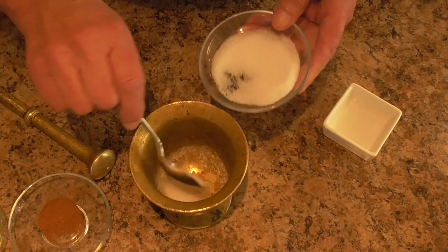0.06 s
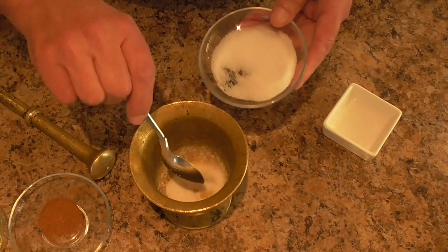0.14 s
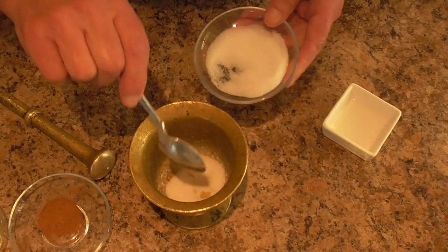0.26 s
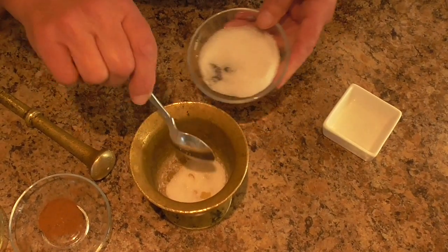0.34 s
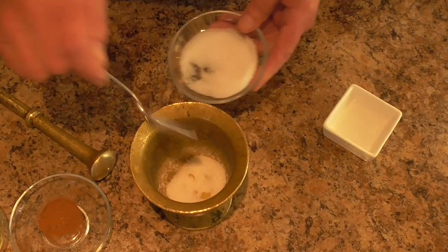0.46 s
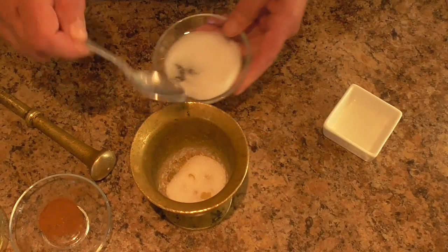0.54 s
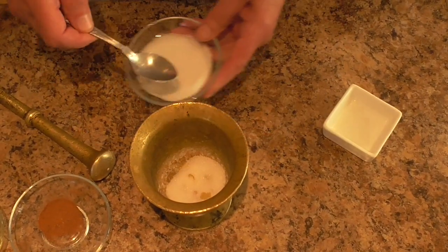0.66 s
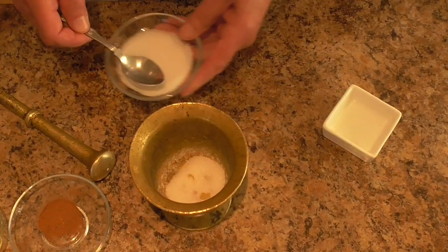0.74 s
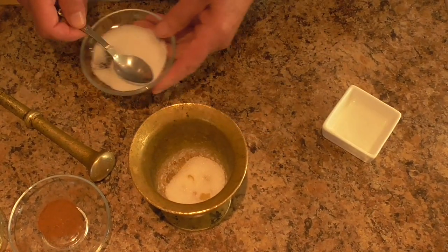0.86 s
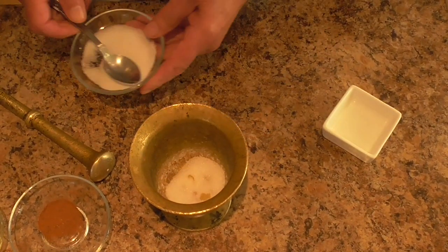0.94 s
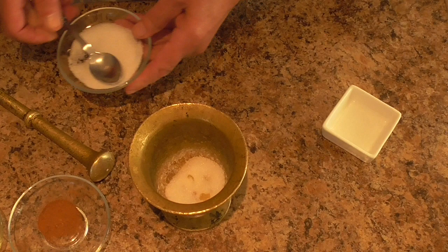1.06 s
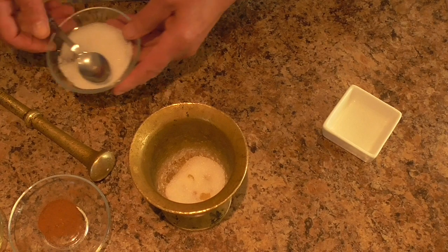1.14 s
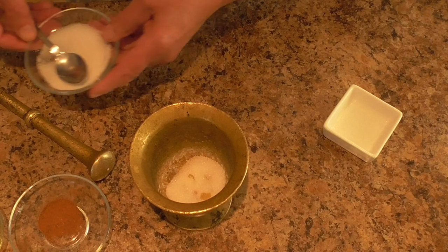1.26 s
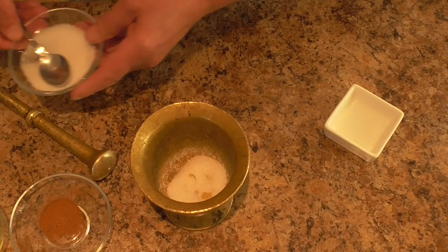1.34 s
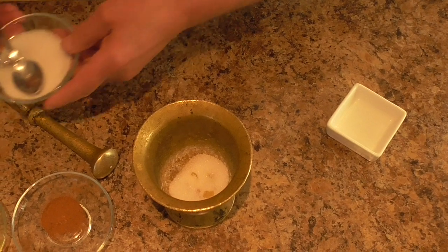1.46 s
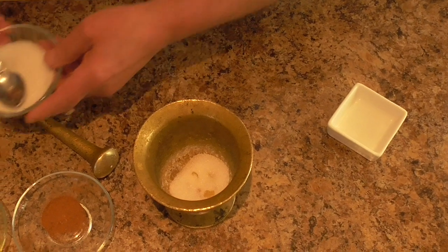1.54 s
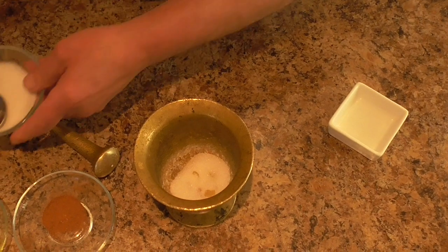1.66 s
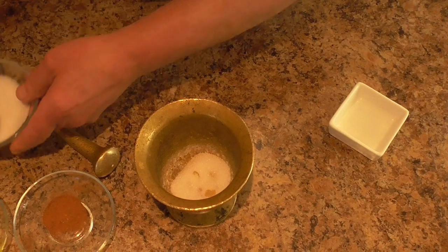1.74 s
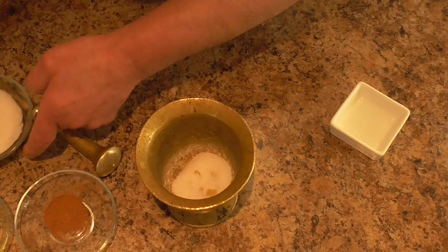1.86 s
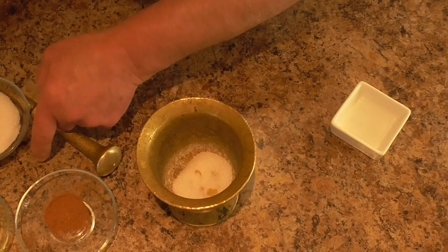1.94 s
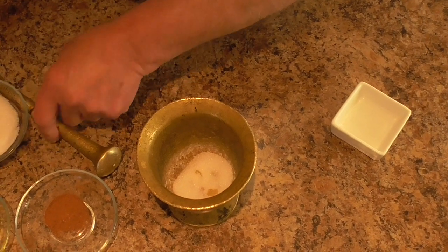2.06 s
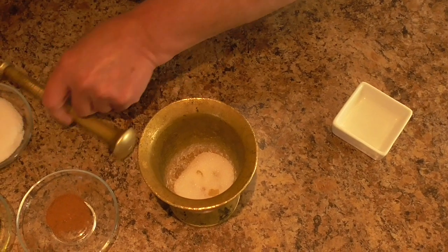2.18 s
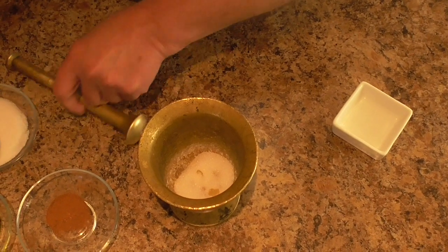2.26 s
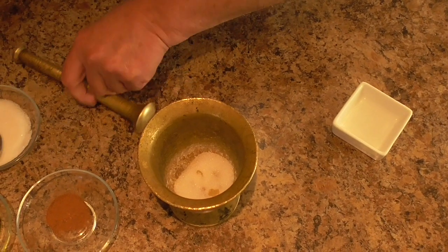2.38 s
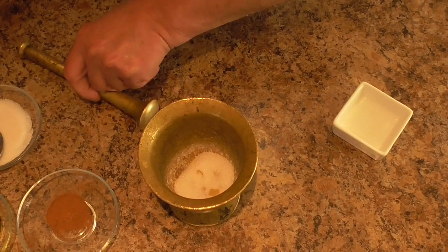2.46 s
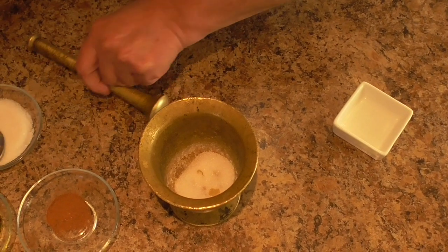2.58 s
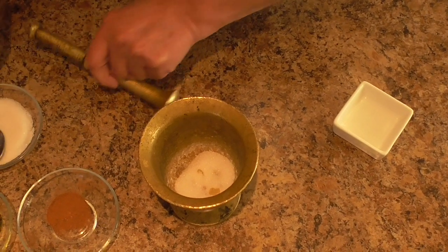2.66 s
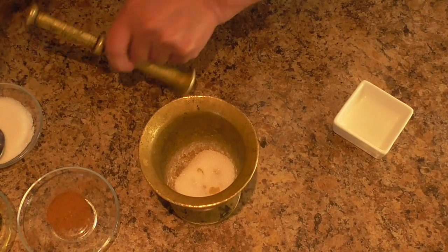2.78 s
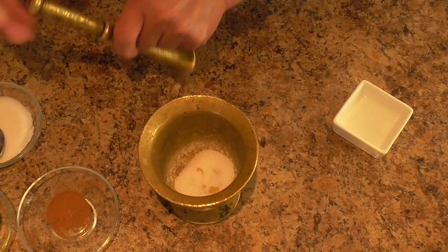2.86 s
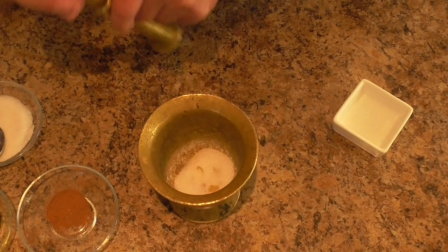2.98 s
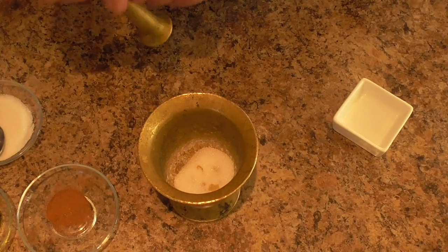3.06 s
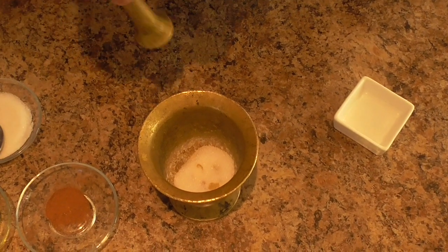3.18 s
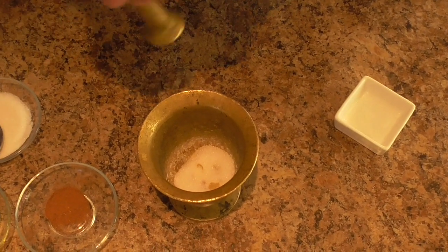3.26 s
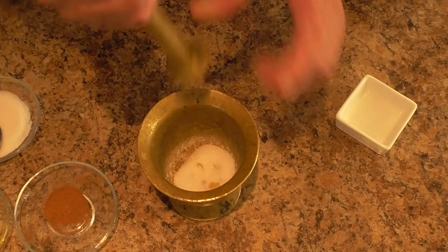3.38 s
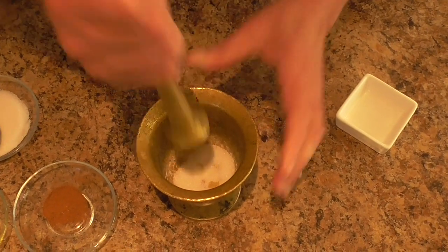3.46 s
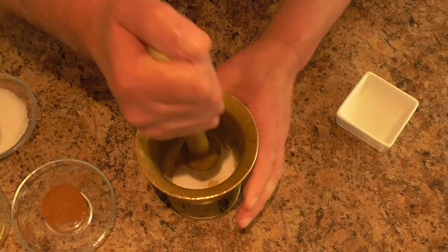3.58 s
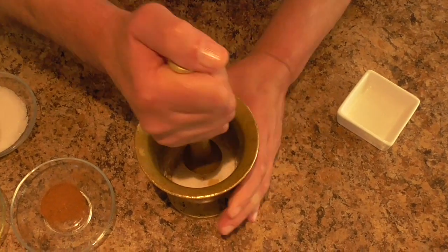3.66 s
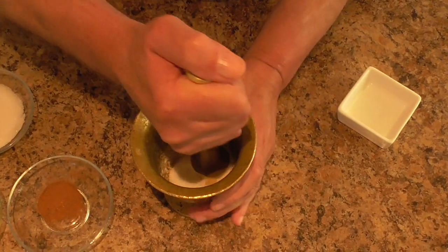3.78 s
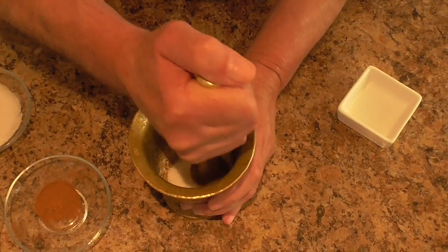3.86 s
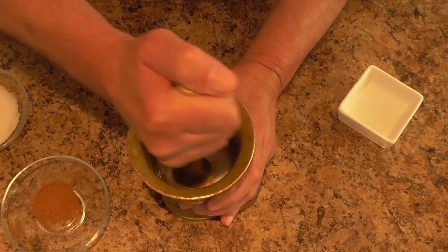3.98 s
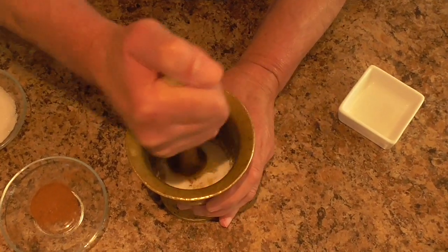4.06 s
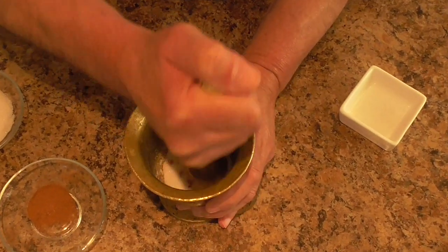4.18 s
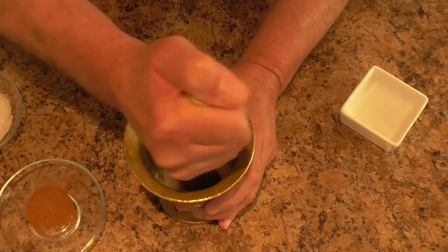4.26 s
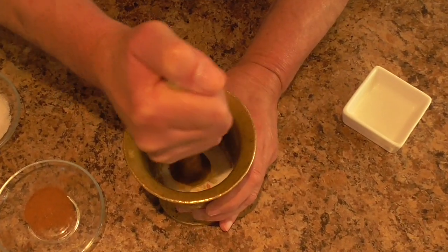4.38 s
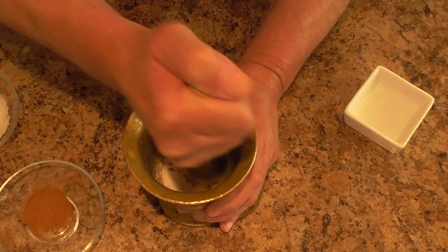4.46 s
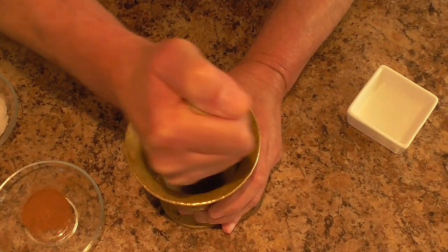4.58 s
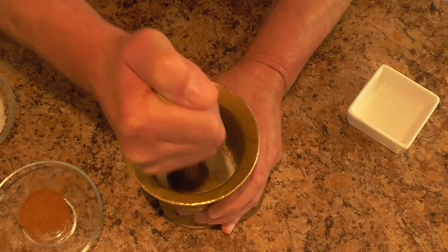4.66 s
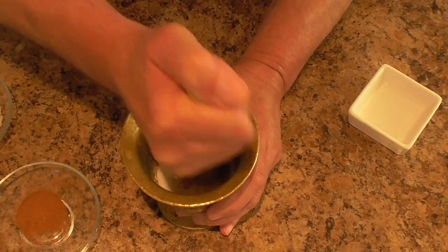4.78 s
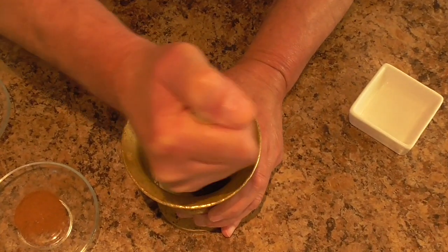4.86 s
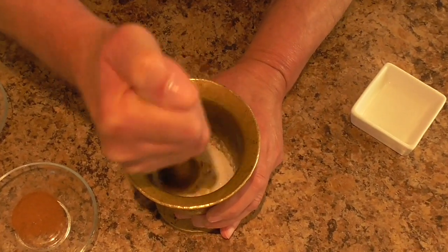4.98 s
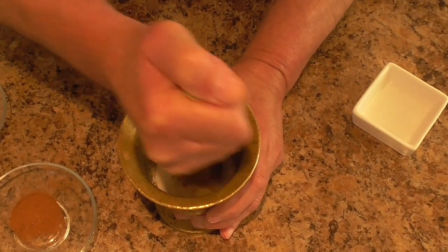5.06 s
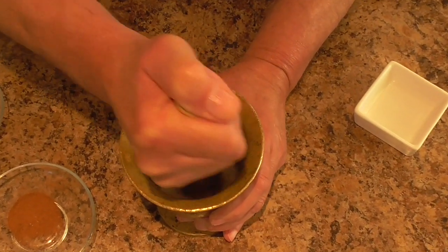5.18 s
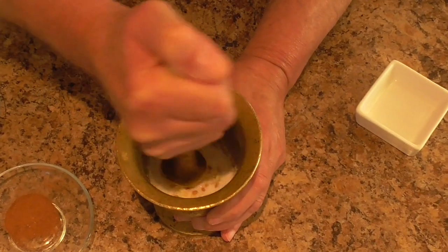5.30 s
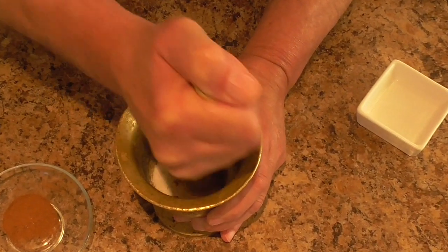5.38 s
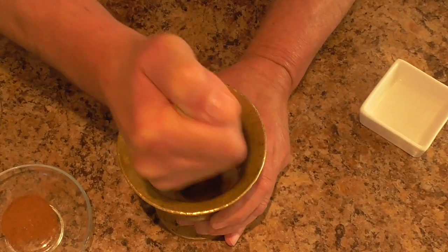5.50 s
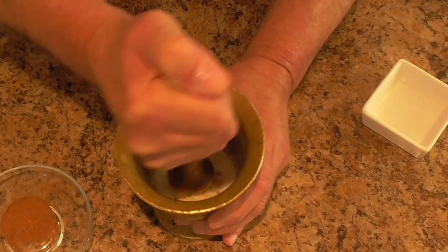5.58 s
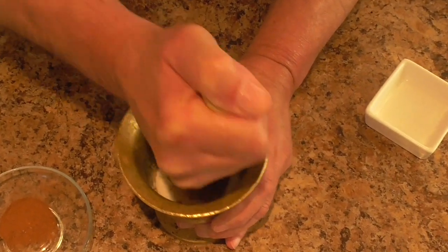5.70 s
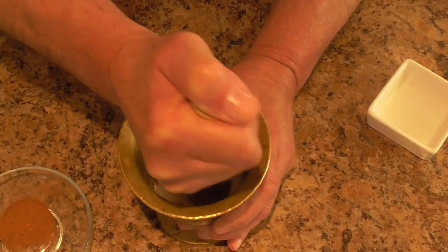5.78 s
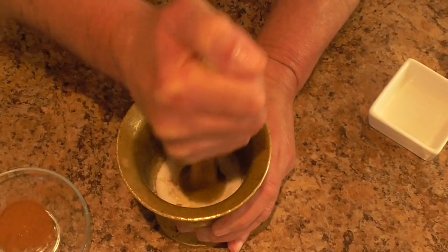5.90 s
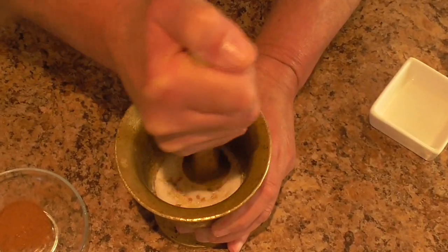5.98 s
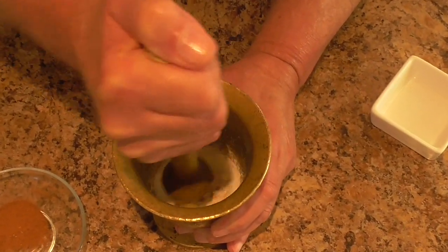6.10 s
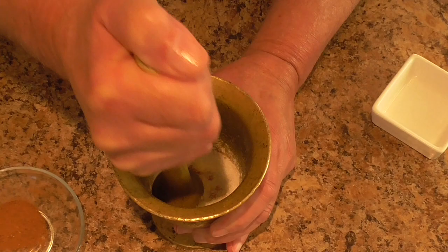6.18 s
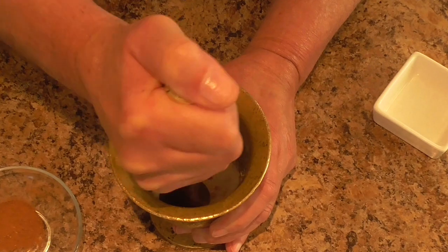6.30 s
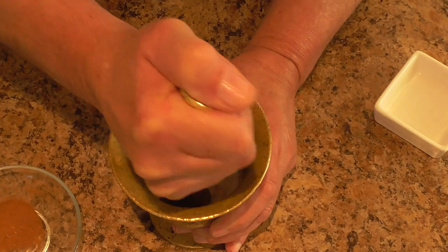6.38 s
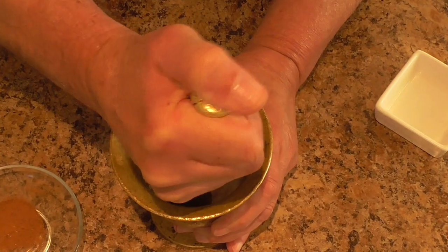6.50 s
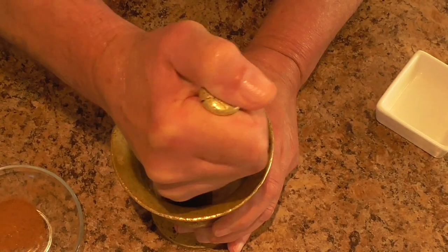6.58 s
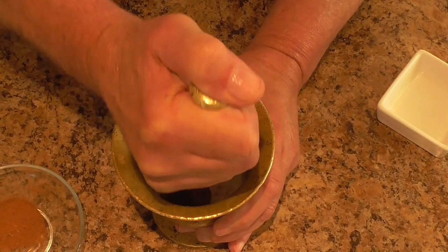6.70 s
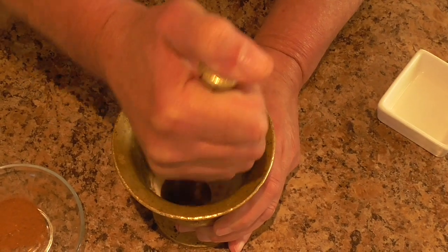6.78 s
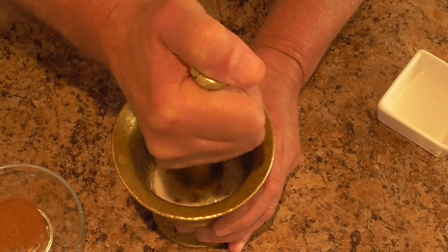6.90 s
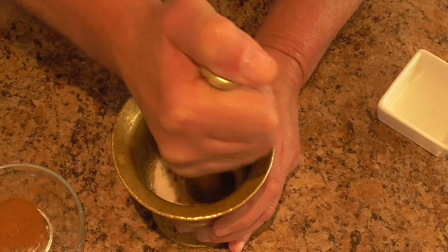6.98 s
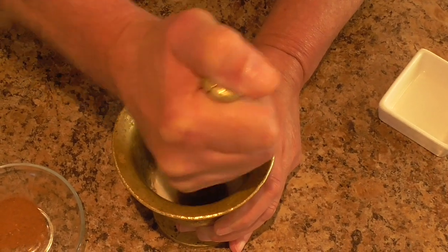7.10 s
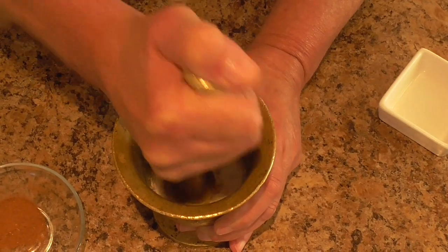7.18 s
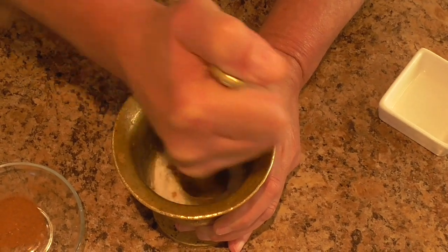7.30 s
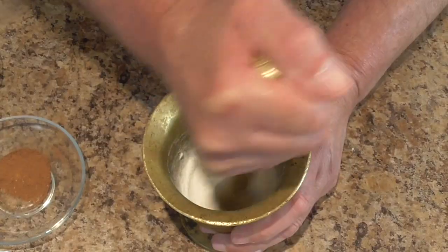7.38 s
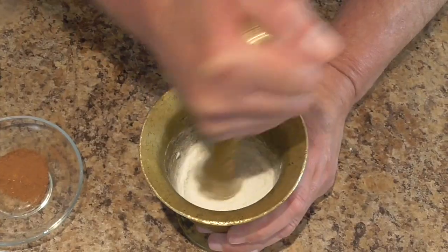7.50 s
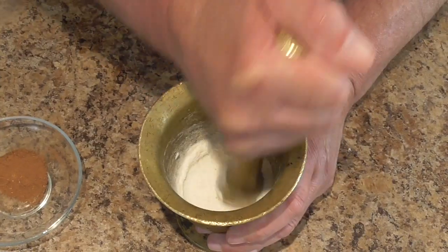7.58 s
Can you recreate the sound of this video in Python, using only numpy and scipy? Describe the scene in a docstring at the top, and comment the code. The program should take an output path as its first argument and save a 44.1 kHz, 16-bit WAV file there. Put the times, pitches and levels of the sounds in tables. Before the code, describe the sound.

A quiet kitchen with steady airy hiss, a faint low hum, a thin whine and rapid tiny mechanical ticking. At about 0.2 s a brief fine hiss of sugar slides onto brass, with a soft tap or two. At 1.16 s a spoon drops into a glass bowl: a sharp, bright clink with a short ring. Dull handling taps follow, one near 1.8 s. From 2.2 to 2.8 s a metal pestle drags over stone, a low wavering groan with rasp and knocks around 2.4 s; then soft skin rustle. From 3.9 s dense, uneven pounding begins: woody low thuds through the counter, sharp treble cracks, gritty crumbling and brassy ringing, strongest around 4.2 to 5.4 s, with glass rattling. A clearer metallic wall strike rings at 6.3 s. Blows thin out, surge near 7.2 to 7.3 s, then a tiny dropout at 7.39 s and faint final crunches.

```python
"""A stone kitchen counter in a room with a humming appliance and a ticking lens drive: filtered noise, sines, pulses.
Sugar slides off a spoon into a brass mortar as hissing grains, then the spoon drops into a glass bowl and rings.
The pestle is dragged up, a wavering stick-slip tone, then pounds and grinds: thuds come through the counter and
rattle the bowl, crystals crack in the treble, the brass rings. Late in the pounding the level dips briefly."""
import sys
import numpy as np
from scipy import signal
from scipy.fft import rfft, irfft, next_fast_len
from scipy.io import wavfile
from scipy.ndimage import map_coordinates

SR = 44100
rng = np.random.default_rng(int(sys.argv[2]) if len(sys.argv) > 2 else 0)


def generate_wav(sig):
    """Save sig (samples, or channels by samples) to the path in sys.argv[1] as 16-bit PCM at SR."""
    pcm = np.round(np.clip(np.atleast_2d(sig).T, -1, 1) * 32767).astype(np.int16)
    wavfile.write(sys.argv[1], SR, pcm)


N = 337365
T = np.arange(round(.3 * SR)) / SR  # time axis of one event [s]

# grinding pressure: (time [s], rumble level [dB])
PRESSURE = [(3.9, -66), (3.986, -25), (4.2, -28.5), (4.5, -32), (4.76, -28), (5.0, -32.5), (5.218, -22.5),
            (5.324, -36.5), (5.618, -28.5), (5.68, -31), (5.994, -35), (6.116, -36.5), (6.26, -66),
            (6.346, -37.5), (6.638, -52.5), (6.834, -51), (7.064, -50), (7.172, -40.5), (7.284, -30),
            (7.4, -39), (7.514, -35), (7.65, -40)]
# damped mortar modes: (frequency [Hz], width [Hz], level [dB])
CUP_MODES = [(2200, 70, -12), (3120, 70, -11), (3400, 200, -8), (5020, 90, -12), (8020, 40, -1),
             (8530, 90, -3), (9650, 40, 1), (10100, 50, 0), (11300, 200, -8), (12750, 120, -3),
             (13200, 80, -5)]
# colour of scraping and knocking: (frequency [Hz], level [dB per Hz])
RASP_SPECTRUM = [(80, -67.5), (240, -15), (400, -2), (629, 3), (980, -10.5), (1410, -10), (1780, -22.5),
                 (3460, -33.5), (4000, -38.5), (5200, -73), (8800, -120)]
# brief dip: (start [s], end [s])
DIP = (7.387, 7.398)


def amp(db):
    """Decibels to gain."""
    return np.exp(np.asarray(db) * np.log(10) / 20)


def unit(x):
    """Scaled to rms 1."""
    return x / np.sqrt(np.mean(x ** 2) + 1e-20)


def along(points, hz):
    """Interpolates (Hz, value) points on a log axis."""
    point_hz, values = np.transpose(points)
    return np.interp(np.log(hz + 1), np.log(point_hz + 1), values)


def curves(rows):
    """One value per sample for each column after the time."""
    time_s, *columns = np.transpose(rows)
    return [np.interp(np.arange(N) / SR, time_s, column) for column in columns]


def gate(rows):
    """1 inside the table's time span, with 14 ms fades."""
    t = np.arange(N) / SR
    fade_s = 0.014
    return np.clip(np.minimum(t - rows[0][0], rows[-1][0] + fade_s - t) / fade_s, 0, 1)


def level(rows, column=0):
    """Gain from a dB column of a table, silent outside its time span."""
    return gate(rows) * amp(curves(rows)[column])


def swell(rows, rise_db_per_s, fall_db_per_s):
    """Gain that climbs to each (time [s], held [s], level [dB]), holds and falls, straight in dB."""
    t = np.arange(N) / SR
    gain = np.zeros(N)
    for s, held_s, db in rows:
        rise_db = rise_db_per_s * np.clip(s - t, 0, 1)
        fall_db = fall_db_per_s * np.clip(t - s - held_s, 0, 1)
        gain += amp(db - rise_db - fall_db)
    return gain


def wobble(rate_hz):
    """A smooth random curve with rate_hz knots a second."""
    coarse = np.arange(0, N + 32, 32)
    knots = rng.standard_normal(int(N * rate_hz / SR) + 4)
    return np.interp(np.arange(N), coarse, map_coordinates(knots, [coarse * rate_hz / SR]))


def filtered(x, response):
    """x through a complex response of frequency."""
    size = next_fast_len(N + SR // 2)
    return irfft(rfft(x, size) * response(np.fft.rfftfreq(size, 1 / SR)), size)[..., :N]


def coloured(x, spectrum):
    """A causal, minimum-phase colour that keeps the rms of white noise."""
    size = 8192
    cepstrum = irfft(np.log(amp(along(spectrum, np.fft.rfftfreq(size, 1 / SR))) + 1e-6))
    cepstrum[1:size // 2] *= 2
    cepstrum[size // 2 + 1:] = 0
    pulse = irfft(np.exp(rfft(cepstrum)))
    return signal.fftconvolve(x, pulse[None] / np.linalg.norm(pulse), axes=1)[:, :N]


def resonant(modes):
    """Response of (Hz, width, dB) resonances, alternating in sign."""
    def response(f):
        total = 0
        for k, (hz, width_hz, db) in enumerate(modes):
            damping = 1j * f * width_hz
            total = total + (-1) ** k * amp(db) * damping / (hz * hz - f * f + damping)
        return total
    return response


def spread(length, alike):
    """Two channels of noise that share part of their motion; alike is their correlation."""
    turn = np.arccos(np.clip(alike, -1, 1)) / 2
    mid, side = rng.standard_normal((2, length))
    return np.array([np.cos(turn) * mid + np.sin(turn) * side, np.cos(turn) * mid - np.sin(turn) * side])


def add(out, s, sound):
    """Adds an event at time s; one begun before the dip ends where the dip starts."""
    if s < DIP[0]:
        sound = sound * (s + T < DIP[0])
    out[:, round(s * SR):][:, :len(T)] += sound


def bursts(rows, tail_db, tail_t60_s, alike, rise, push=0.):
    """Each (s, dB, t60) gives a push, a puff of noise and the kitchen's longer answer; rise is a share of t60."""
    out = np.zeros((2, N + len(T)))
    for s, db, t60_s in rows:
        puff = amp(-60 * T / t60_s) * (1 - np.exp(-T / (rise * t60_s)))
        tail = amp(tail_db - 60 * T / tail_t60_s) * (1 - np.exp(-T / 0.0066))
        sound = (puff + tail) * spread(len(T), alike)
        sound[:, round(rise * t60_s * SR)] += push  # one sample
        add(out, s, amp(db) * sound)
    return out[:, :N]


def rings(rows, modes, scatter_db):
    """Each (s, dB, hold, tilt) blow rings modes of random strength until damped; random wavering roughens them."""
    out = np.zeros((2, N + len(T)))
    for s, db, hold_s, tilt_db in rows:
        damping = amp(-900 * np.maximum(T - hold_s, 0))
        for hz, mode_db, t60_s in modes:
            size, pan = rng.standard_normal(2)
            knots = np.linspace(0, T[-1], num=40)
            waver, drift = (np.interp(T, knots, v) for v in rng.standard_normal((2, len(knots))))
            start_db = db + mode_db + scatter_db * size + tilt_db * np.log2(hz / 8500)
            decay = amp(-60 * T / t60_s) + amp(-17 - 60 * T / .33)  # the room carries each mode on
            fade = amp(start_db + 3.5 * waver) * decay * damping * (1 - np.exp(-T / .001))
            phase = 2 * np.pi * hz * T + 1.3 * drift + [[.3 * pan], [-.3 * pan]]
            add(out, s, fade * np.sin(phase))
    return out[:, :N]


def grains(rate_hz, spiky_db, life_s, alike):
    """Noise of rms 1 made of short decaying snaps of very unequal size over a steady floor."""
    snap_db = spiky_db * np.minimum(rng.exponential(size=N), 4)
    snaps = (rng.random(N) < rate_hz / SR) * amp(snap_db)
    shape = signal.lfilter([1], [1, -np.exp(-1 / (life_s * SR))], snaps)
    return unit((shape + 1.28 * shape.mean()) * spread(N, alike))


def kitchen():
    """Stereo noise for room air and hiss, wavering sines for a hum, resonant noise for a whine, pulses for a lens."""
    # air colour: (frequency [Hz], level [dB per Hz])
    air_spectrum = [(12, -66), (20, -12), (91, -12), (117, -26), (151, -9.5), (195, -9), (427, -11.5),
                    (506, -12), (651, -16.5), (1350, -19.5), (1690, -30), (3420, -29.5), (12100, -29.5),
                    (15100, -34.5), (16500, -54.5)]
    # (frequency [Hz], left-right likeness)
    air_alike = [(60, 0.66), (240, 0.26), (950, 0.072), (3770, 0.33), (15000, 0.033)]
    # appliance: (frequency [Hz], level [dB])
    hum_tones = [(145.3, -57.5), (500.6, -68.5), (532.9, -70.5), (807.5, -76.5)]
    # lens drive: (time [s], tick level [dB])
    lens_ticks = [(0, -39), (.4, -28.5), (2.3, -36.5), (3.9, -35), (6.2, -27), (6.4, -46), (7.65, -49)]
    # lens drive modes: (frequency [Hz], width [Hz], level [dB])
    lens_modes = [(2230, 340, -2), (3391, 220, -0.5), (3900, 300, -3), (4958, 60, 3)]

    def mid_side_response(hz):
        turn = np.arccos(np.clip(along(air_alike, hz), -1, 1)) / 2
        return amp(along(air_spectrum, hz)) * [np.cos(turn), np.sin(turn)]

    mid, side = filtered(rng.standard_normal((2, N)), mid_side_response)
    air = amp(-59 + 0.23 * wobble(1)) * unit(np.array([mid + side, mid - side]))
    t = np.arange(N) / SR
    hum = np.zeros(N)
    for hz, db in hum_tones:
        gain = np.sqrt(2) * amp(db + 0.48 * wobble(3.09))
        hum += gain * np.sin(2 * np.pi * hz * t + 0.66 * wobble(15))
    ticks = np.zeros(N)
    tick_s = np.arange(.0, N / SR - .01, 1 / 25)
    ticks[(tick_s * SR).astype(int)] = amp(2 * rng.standard_normal(len(tick_s)))
    lens = amp(curves(lens_ticks)[0]) * filtered(ticks, resonant(lens_modes))
    whine = amp(-58) * filtered(rng.standard_normal(N), resonant([(4958, 30, 2), (3391, 40, 0)]))
    return air + whine + hum * amp([[1.3], [-1.3]]) + lens


def handling():
    """Small dull taps of fingers, spoon and bowl: short decaying sines with a little noise."""
    # (time [s], peak level [dB], frequency [Hz])
    taps = [(0.1121, -49.5, 1210), (0.9722, -55, 8600), (1.0849, -53, 2000), (1.094, -51, 1100),
            (1.4322, -50.5, 970), (1.8018, -41.5, 1150), (2.075, -56, 2330), (2.9875, -61, 1060),
            (3.1936, -48.5, 990), (3.897, -47, 980)]
    out = np.zeros((2, N + len(T)))
    for s, db, hz in taps:
        ping = np.sin(2 * np.pi * hz * T) + .12 * spread(len(T), .8)
        add(out, s, amp(db - 60 * T / 0.023) * ping)
    return out[:, :N]


def pouring():
    """A stream of fine sugar grains hisses on the brass and feeds its narrow modes."""
    # sugar falling on brass: (time [s], held [s], level [dB])
    pours = [(.16, 0.094, -63.5)]
    gain = swell(pours, rise_db_per_s=280, fall_db_per_s=230)
    stream = gain * grains(rate_hz=9400, spiky_db=8.0, life_s=0.00035, alike=0.73)
    hiss = coloured(stream, [(6000, -35), (8000, -2), (10500, 3), (14500, 2), (16500, -26)])
    narrow = [(hz, 25, db) for hz, width_hz, db in CUP_MODES if 7000 < hz and width_hz < 85]
    return amp(4.5) * hiss + amp(23.5) * filtered(stream, resonant(narrow))


def metal():
    """Hard contacts clatter and knock as noise bursts; spoon, glass bowl and mortar wall ring in decaying modes."""
    # spoon, bowl and pestle: (time [s], clatter level [dB], t60 [s], knock over clatter [dB])
    clinks = [(1.1582, -16, 0.01, -47), (2.3777, -35, 0.066, 26), (2.3867, -30, 0.084, 1),
              (2.431, -35, 0.061, 17), (2.6186, -42.5, 0.027, -4), (2.7377, -48, 0.014, -6),
              (2.7862, -50, 0.023, 9), (2.81, -48, .04, 10.5)]
    # (frequency [Hz], level [dB per Hz])
    clatter_spectrum = [(400, -11.5), (1200, -1.5), (2500, -5), (5000, 0), (8000, -0.5), (11000, -3.5),
                        (13500, -13.5), (16500, -25)]
    # the spoon lands: (time [s], level [dB], hold until damped [s])
    drops = [(1.159, -16, .5)]
    # the bowl is jolted: (time [s], level [dB], tilt [dB per octave])
    rattles = [(1.16, -21, 5), (2.387, -32, -8), (2.433, -39, -8), (4.251, -31, 3), (4.463, -36, 4),
               (4.735, -38, 0), (4.928, -29, 3), (5.052, -25, 5), (5.12, -30, 6), (5.208, -38, 7),
               (5.287, -37, 3), (5.362, -38, 6), (5.52, -43, 4), (7.127, -47, 8), (7.206, -41, 5),
               (7.315, -31, 6)]
    # pestle on the wall: (time [s], level [dB], hold until damped [s])
    strikes = [(6.0805, -58.5, 0.13), (6.2921, -28, 0.13)]
    # modes of spoon, bowl and mortar wall: (frequency [Hz], level [dB], t60 [s])
    spoon_modes = [(2261, -20, .12), (2993, -26, .15), (4300, -14, .04), (6390, -22, .25), (6914, -4, .08),
                   (8285, -26, .2), (10090, -18, .12), (10283, -4, .12), (10740, -11, .1),
                   (13260, -18, .09), (14800, -20, .1)]
    bowl_modes = [(2261, -34, .08), (3390, -20, .05), (5015, -8, .11), (8540, -1, .07), (10283, -6, .08),
                  (12630, -10, .08)]
    wall_modes = [(1265, 2, .4), (2180, -14, .21), (3316, -3, .28), (5168, -9, .35), (5200, -12, .3),
                  (5335, -7, .35), (6498, -17, .2), (6665, -16, .12), (8296, -18, .2), (8816, 4, .12),
                  (10680, -22, .25)]

    clatter = bursts([(s, db, t60_s) for s, db, t60_s, _ in clinks],
                     tail_db=-13, tail_t60_s=0.31, alike=0.35, rise=0.016)
    knock = bursts([(s, db + over_db, .03) for s, db, _, over_db in clinks],
                   tail_db=-6, tail_t60_s=0.1, alike=.93, rise=0.033, push=5.2)
    spoon = rings([(s, db, hold_s, 0) for s, db, hold_s in drops], spoon_modes, scatter_db=1)
    # a 0.5 s hold outlasts the event: the bowl stays undamped
    bowl = rings([(s, db, .5, tilt_db) for s, db, tilt_db in rattles], bowl_modes, scatter_db=1.5)
    wall = rings([(s, db, hold_s, 0) for s, db, hold_s in strikes], wall_modes, scatter_db=1)
    return coloured(clatter, clatter_spectrum) + coloured(knock, RASP_SPECTRUM) + spoon + bowl + wall


def dragging():
    """Unsteady stick-slip gives a wavering low tone over rasp and rumble; fingers slide along as soft grains."""
    # the pestle scrapes over stone: (time [s], rasp level [dB], rumble level [dB])
    scrape = [(2.17, -65, -57), (2.27, -46.5, -37), (2.33, -26, -31), (2.38, -32.5, -29),
              (2.41, -26.5, -48), (2.446, -30, -41.5), (2.58, -49, -54), (2.622, -39.5, -51),
              (2.678, -60, -46), (2.768, -39.5, -37), (3.0, -77, -66)]
    # the pestle chatters over stone: (time [s], slip rate [Hz], level [dB])
    drag = [(2.2, 320, -56), (2.246, 347.4, -38.5), (2.296, 304, -24.5), (2.362, 310.5, -23),
            (2.41, 346.6, -35), (2.49, 348.5, -36.5), (2.56, 359.3, -43), (2.74, 300, -39)]
    # skin on brass: (time [s], held [s], level [dB])
    slides = [(2.334, 0.014, -54.5), (2.812, 0.0091, -48.5), (2.785, .01, -59), (3.06, 0.065, -57.5),
              (3.2, 0.35, -61.5)]
    # (frequency [Hz], level [dB per Hz])
    skin_spectrum = [(1500, 7), (3000, 0.5), (5500, -3), (8000, 0.5), (12000, -2.5), (15000, -12),
                     (16500, -30)]

    slip_hz, slip_db = curves(drag)
    phase = 2 * np.pi * np.cumsum(slip_hz * (1 + 0.038 * wobble(60))) / SR
    slips = np.sin(phase)
    for k in (2, 3):
        slips += amp(-9 * k + 4 * wobble(30)) * np.sin(k * phase + wobble(40))
    tone = gate(drag) * np.sqrt(2) * amp(slip_db + 2.5 * wobble(70)) * slips
    rasp = level(scrape) * grains(rate_hz=260, spiky_db=7.5, life_s=0.0054, alike=0.82)
    rumble = level(scrape, column=1) * spread(N, 0.95)
    rumble_spectrum = [(40, -28), (100, -8.0), (200, 11.0), (280, 7.5), (500, -52.0)]
    skin_gain = swell(slides, rise_db_per_s=370, fall_db_per_s=240)
    skin = skin_gain * grains(rate_hz=2300, spiky_db=-9, life_s=0.0014, alike=0.44)
    scraping = coloured(rasp, RASP_SPECTRUM) + coloured(rumble, rumble_spectrum)
    return tone + scraping + coloured(skin, skin_spectrum)


def counter():
    """Blows and grinding pressure shake the stone as low noise; hard blows also knock higher."""
    # blows felt in the counter: (time [s], level [dB])
    thuds = [(3.932, -12.5), (3.99, -15.5), (4.112, -8), (4.186, -21), (4.235, 2.5), (4.248, -6),
             (4.314, -17.5), (4.362, -4.5), (4.442, -8), (4.453, -6), (4.59, -3), (4.657, -14), (4.697, -2),
             (4.73, -1), (4.817, -5), (4.871, -9.5), (4.916, -1), (5.025, -6.5), (5.036, 3.5), (5.051, 0.5),
             (5.109, -1), (5.138, -6), (5.198, -13.5), (5.276, -3), (5.326, -10), (5.36, -10.5),
             (5.389, -21), (5.481, -11), (5.513, -8), (5.604, -7.5), (5.67, -16), (5.778, -10),
             (5.861, -12.5), (6.053, -17), (6.291, -2), (6.324, -10.5), (6.399, -11), (6.416, -7.5),
             (6.506, -2), (6.582, -8.5), (6.742, -7), (6.754, -10), (6.968, -19), (6.989, -7.5),
             (7.04, -19.5), (7.126, -17), (7.204, -3), (7.281, -5), (7.301, 0), (7.456, -20.5),
             (7.522, -20), (7.554, -20.5)]
    # colours of thud and knock: (frequency [Hz], level [dB per Hz])
    thud_spectrum = [(20, -85), (50, -25), (80, -21.5), (110, -29), (155, -2), (218, 2.5), (273, -2),
                     (330, 1.5), (426, -7.5), (494, -3.5), (573, -4.5), (640, -23), (720, -16),
                     (1400, -54.5), (2500, -87)]
    knock_spectrum = [(530, -19), (900, 11.5), (1270, 3), (1670, -8), (2140, -6), (3000, -32), (3900, -45),
                      (6600, -120)]
    t60_s, softer_longer = 0.0372, 0.19  # at 0 dB; dB of extra length per dB softer
    knock_db, knock_grows = -22, 1.68  # knock of a 0 dB blow; it grows faster than the thud

    blows = bursts([(s, db, t60_s * amp(-softer_longer * db)) for s, db in thuds],
                   tail_db=-16.5, tail_t60_s=0.34, alike=0.96, rise=0.0833, push=3.16)
    knocks = bursts([(s, knock_db + knock_grows * db, t60_s) for s, db in thuds],
                    tail_db=-7, tail_t60_s=0.34, alike=0.64, rise=0.1)
    rumble = level(PRESSURE) * grains(rate_hz=150, spiky_db=0, life_s=0.017, alike=0.91)
    return coloured(blows + rumble, thud_spectrum) + coloured(knocks + amp(-20) * rumble, knock_spectrum)


def singing(x):
    """Each mode of the cup is fed unevenly as the point of contact wanders."""
    out = np.zeros_like(x)
    for hz, width_hz, db in CUP_MODES:
        feed = x * amp(db + 5 * wobble(12))
        out += signal.lfilter(*signal.iirpeak(hz, hz / width_hz, SR), feed)
    return out


def crystals():
    """Sugar and spice crack in noise snaps, crumble in clumps of grains and set the damped cup singing."""
    # breaking crystals: (time [s], snap level [dB], body over snap [dB])
    cracks = [(3.9317, -13.5, -18), (3.9751, -47, -25), (3.992, -23, -12), (4.05, -28, -25),
              (4.1146, -11, -33), (4.173, -23, -37), (4.204, -17.5, -40), (4.239, -14, -3),
              (4.341, -23, -11), (4.3626, -21, -5), (4.394, -24.5, -26), (4.4509, -9, -13),
              (4.496, -31, -26), (4.5703, -39, -30), (4.5921, -12.5, -18), (4.6411, -30, -29),
              (4.6602, -23, -17), (4.7012, -27, 5.5), (4.7314, -9, -11), (4.818, -22, -9),
              (4.8231, -10, -37), (4.8711, -25, -23), (4.9164, -17.5, -3), (4.9285, -35, -28),
              (5.0279, -28.5, 9), (5.0408, -17.5, 0), (5.051, -17, -3), (5.118, -16.5, -1.5),
              (5.141, -16, -17), (5.1904, -18.5, -14), (5.2756, -14, -8), (5.3362, -10.5, -31),
              (5.362, -15.5, -11), (5.458, -26, -35), (5.4793, -20, -14), (5.5099, -18.5, -9),
              (5.6024, -28, -1.5), (5.6364, -14, -13.5), (5.7222, -32.5, -38), (5.768, -30, -29),
              (5.777, -24.5, -6), (5.863, -22, -8), (5.9716, -44, -26), (6.0534, -31, -33),
              (6.0634, -23.5, -33), (6.112, -30, -34), (6.2929, -19.5, 2), (6.421, -24, -19),
              (6.427, -22.5, -5), (6.437, -33, -20), (6.5069, -15, -7.5), (6.5815, -18, -10),
              (6.664, -42.5, -40), (6.744, -16, -10), (6.754, -30, -19), (6.891, -39.5, -43),
              (6.977, -31, -8), (6.9883, -28, 2), (7.0003, -21, -30), (7.038, -26.5, -36),
              (7.122, -28, -32), (7.1971, -24, -27), (7.2057, -15.5, -8.5), (7.2888, -19.5, -8),
              (7.3022, -10.5, -7), (7.5131, -51, -10), (7.557, -38, -13)]
    # (frequency [Hz], level [dB per Hz])
    crystal_spectrum = [(2650, -46.5), (4500, -18), (5810, -12), (7020, -2.5), (8540, 0), (13000, -2),
                        (15200, -8.5), (16100, -21), (16500, -53)]
    snap_t60_s = 0.0077
    yield_s, yield_db = 0.02, 55  # they give way this long before the crack, starting this much softer
    crumble_db, crumble_t60_s = -21, 0.095
    full_db, grit_db, grit_grows = -28, -47.5, 1.5  # full pressure; its grit level; grit dB per pressure dB

    snaps = bursts([(s, db, snap_t60_s) for s, db, _ in cracks],
                   tail_db=-23, tail_t60_s=.17, alike=.85, rise=.1)
    body = bursts([(s, db + over_db, snap_t60_s) for s, db, over_db in cracks],
                  tail_db=-9, tail_t60_s=0.17, alike=0.64, rise=0.054)
    shape_db = np.minimum(yield_db * (T / yield_s - 1), -60 * (T - yield_s) / crumble_t60_s)
    crumble = np.zeros((1, N + len(T)))
    for s, db, _ in cracks:
        add(crumble, s - yield_s, amp(db + crumble_db + shape_db))
    grit = gate(PRESSURE) * amp(grit_db + grit_grows * (curves(PRESSURE)[0] - full_db))
    clumps = unit(amp(wobble(35)))
    crunch_gain = (grit + crumble[:, :N]) * clumps
    crunch = crunch_gain * grains(rate_hz=450, spiky_db=5, life_s=.0014, alike=.75)
    body_spectrum = [(1000, 3), (2000, -18), (3400, -1.5), (4200, -10), (5200, -7), (6500, -39.0)]
    cup = amp(10) * singing(crunch + snaps)
    treble = coloured(snaps + crunch, crystal_spectrum)
    return treble + coloured(body + amp(-6.5) * crunch, body_spectrum) + cup


def scene():
    """Everything on the counter over the room."""
    return kitchen() + handling() + pouring() + metal() + dragging() + counter() + crystals()


def record(dry):
    """The microphones differ in colour, loud peaks clip softly, the level dips briefly, bass and top are cut."""
    # (frequency [Hz], left minus right [dB])
    balance = [(60, -4.5), (180, 0.5), (550, 0), (1650, -1.5), (4970, 2), (15000, -3)]
    bass_cut_hz, top_hz = 45, 16300
    paired = filtered(dry, lambda hz: amp(along(balance, hz) * np.array([[.5], [-.5]])))
    clipped = paired / (1 + np.abs(paired) ** 12) ** (1 / 12)
    t = np.arange(N) / SR
    dipped = clipped * np.clip(np.maximum(DIP[0] - t, t - DIP[1]) / .002, .1, 1)  # down to a tenth
    return filtered(dipped, lambda hz: (1j * hz / (bass_cut_hz + 1j * hz)) ** 2 * (hz < top_hz))


dry = scene()
out = record(dry)
generate_wav(out)
```